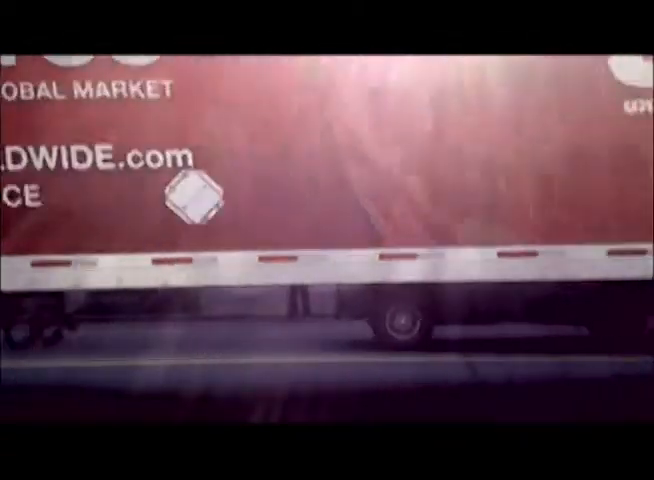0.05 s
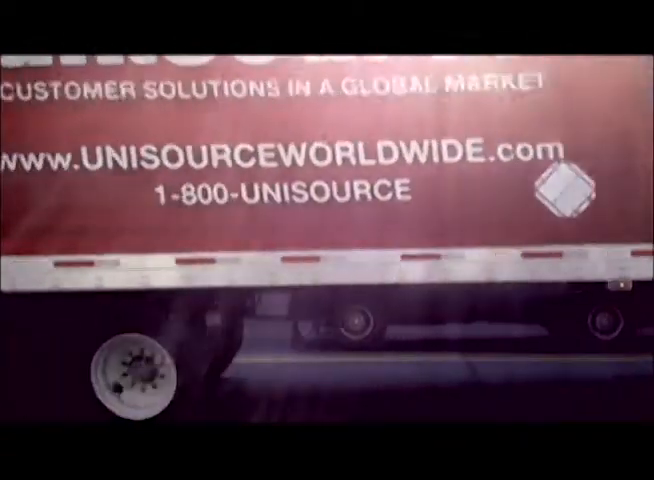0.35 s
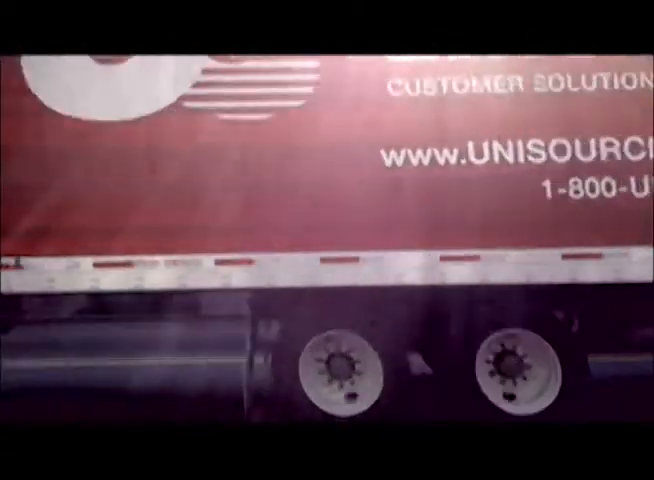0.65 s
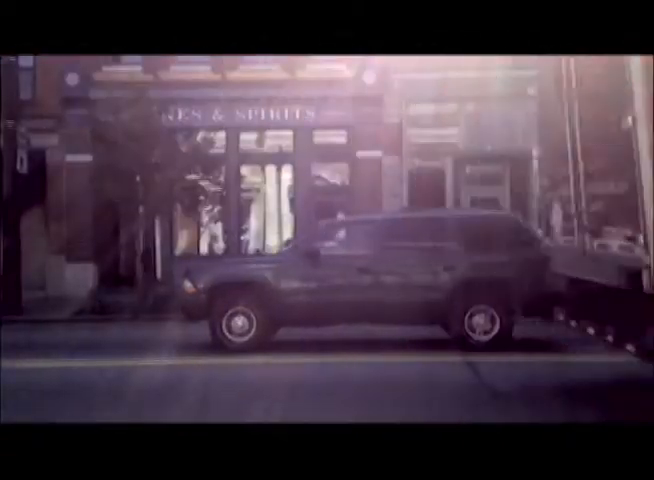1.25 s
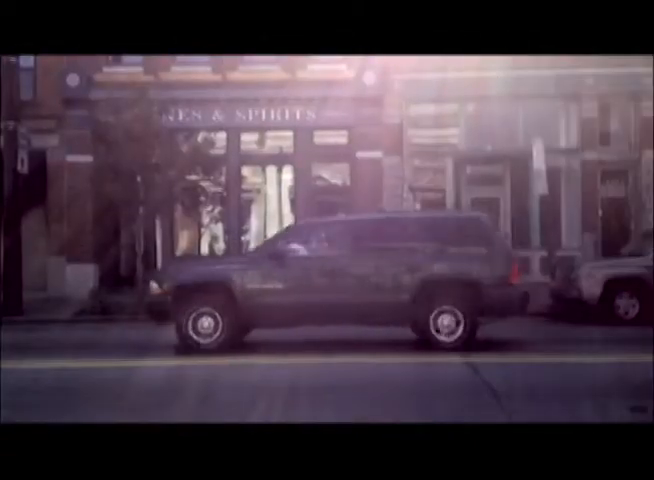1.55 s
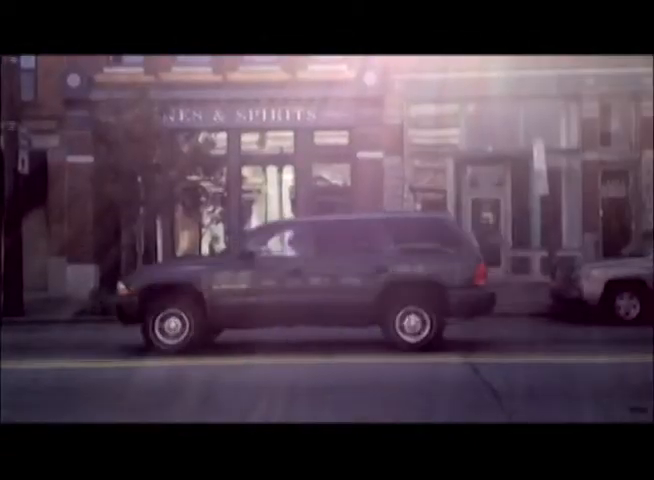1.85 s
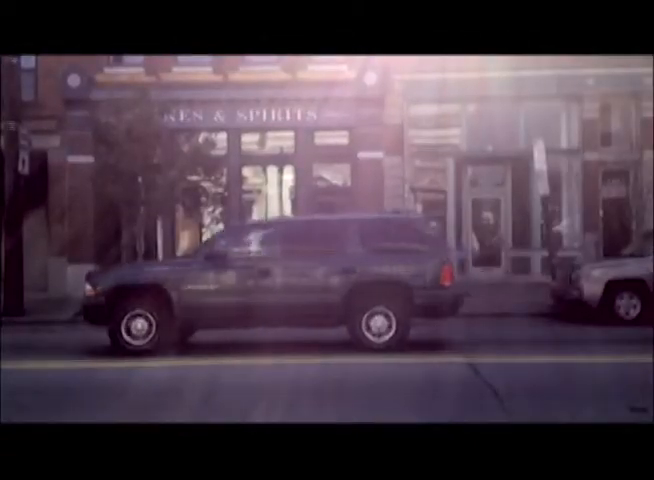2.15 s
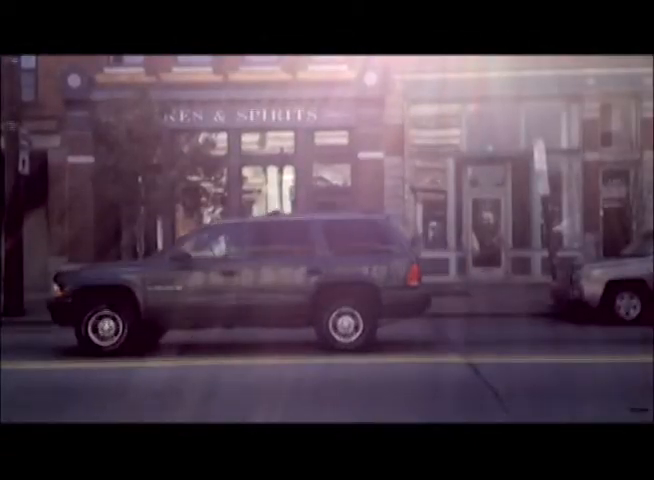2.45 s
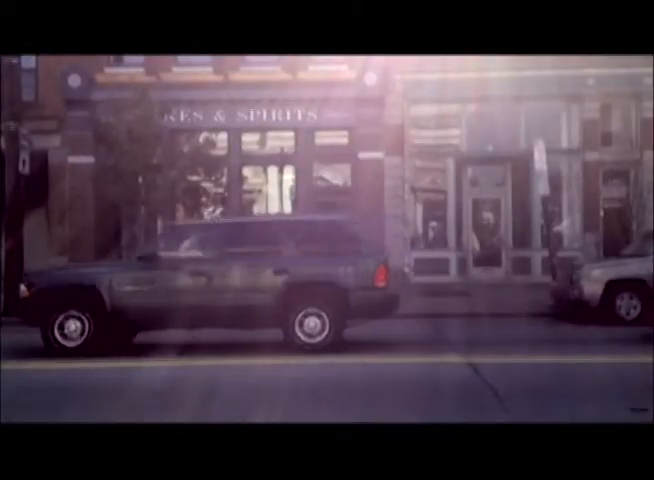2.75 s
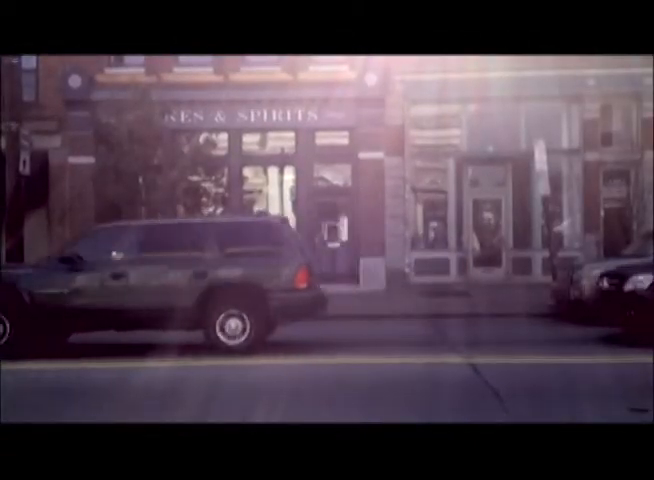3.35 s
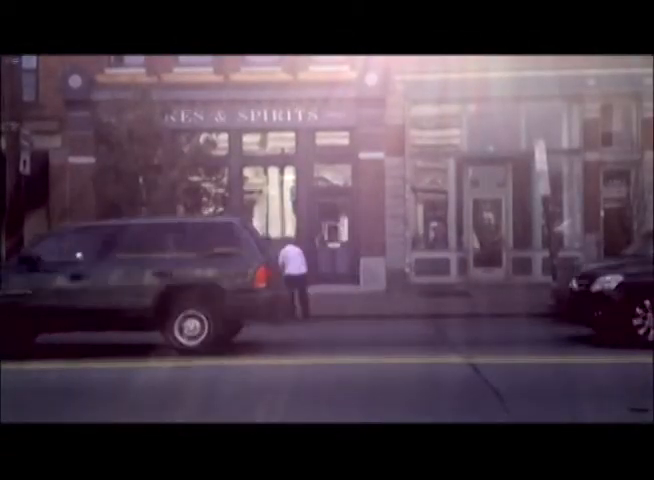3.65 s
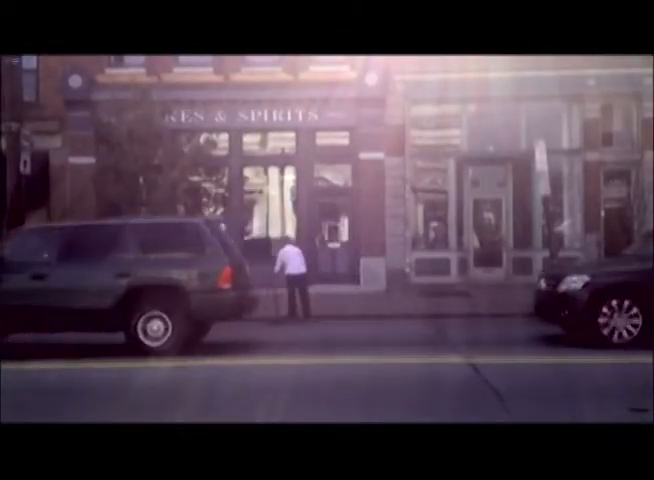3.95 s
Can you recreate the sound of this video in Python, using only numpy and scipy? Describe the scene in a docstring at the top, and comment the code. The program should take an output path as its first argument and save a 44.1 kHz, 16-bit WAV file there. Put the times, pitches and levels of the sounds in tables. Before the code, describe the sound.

A large truck passes close by, its engine droning and tyres roaring and hissing, loudest in the first second. The drone dies by about 1.2 seconds, and a faint high whistle winds down. Short, high metal squeaks recur from 0.3 to 3.4 seconds, sharpest around 0.5 and 1.7. Slow city traffic hums on with soft exhaust swells, and another car's tyres hiss faintly closer near 4 seconds.

```python
"""City street: a semi-trailer passes close by over the hum and wash of slow traffic.
Its exhaust drones, its tyres roar and hiss, and its turbo winds down as the throttle shuts.
Metal rubs in the running gear, squeaks and rings; the house fronts throw the squeaks back.
Car exhausts boom across the street, and at the end the tyres of another car draw near."""
import sys
import numpy as np
from scipy import signal
from scipy.fft import rfft, irfft
from scipy.io import wavfile
from scipy.ndimage import uniform_filter1d

SR = 44100
rng = np.random.default_rng(int(sys.argv[2]) if len(sys.argv) > 2 else 0)


def transcribe(signal):
    """Save signal, clipped to [-1, 1], as a 16-bit WAV file at the path in sys.argv[1]."""
    frames = np.atleast_2d(signal).T
    limited = np.clip(frames, -1, 1)
    pcm = np.round(limited * 32767).astype(np.int16)
    wavfile.write(sys.argv[1], SR, pcm)


N = 176400
T = np.arange(N) / SR

# two strongest exhaust tones (time [s], pitch [Hz], level [dB])
EXHAUST_LOW_TONE = [(0, 146.8, -24.5), (.15, 149.4, -25.5), (.28, 153.8, -20.5), (.44, 155, -23),
                    (.52, 156.9, -18.5), (.64, 156.7, -21), (.71, 156.5, -28), (.8, 157.1, -20),
                    (.93, 156, -32), (1.2, 151.4, -43)]
EXHAUST_HIGH_TONE = [(0, 181.2, -30), (.08, 184.4, -19.5), (.26, 190.5, -24), (.37, 179, -28),
                     (.43, 183.5, -25), (.5, 182.5, -28.5), (.72, 182.3, -25.5), (.83, 180.6, -36),
                     (1, 176, -58)]
# engine cycle (time [s], rate [Hz], level of summed overtones [dB])
ENGINE_CYCLE = [(0, 36.7, -24), (.28, 38.06, -27.5), (.5, 39, -35), (.8, 38.95, -31.5), (1.2, 38.2, -65)]
# its overtones (multiple [1], relative level [dB])
ENGINE_ORDERS = [(7, -7.5), (8, 5), (9, -7), (11, -4), (12, -3), (13, -6.5), (14, 1)]
# tyre roar with engine clatter; close hiss of air and tread (frequency [Hz], relative density [dB])
ROAR_SPECTRUM = [(30, -45), (60, -36), (110, -6.5), (170, 1), (300, 0), (480, -1.5), (680, -5), (1000, -3),
                 (1450, -5.5), (2000, -10), (2700, -21.5), (5000, -35.5)]
HISS_SPECTRUM = [(1000, -17), (2700, -10.5), (3300, -4.5), (3830, 0.5), (4150, -0.5), (4700, 0.5),
                 (5050, -11.5), (6050, -14.5), (7200, -8.5), (9500, -16), (13300, -12.5), (15300, -40)]
# their envelopes (time [s], level [dB])
ROAR_LEVEL = [(0, -22.5), (.25, -21), (.5, -25), (.8, -25.5), (1.1, -29.5), (1.35, -31.5), (1.7, -31),
              (2.2, -34.5), (3, -41), (4, -40.5)]
HISS_LEVEL = [(0, -26), (.3, -28.5), (.55, -32.5), (.9, -40), (1.3, -44), (1.7, -45.5), (2.2, -48),
              (3, -60), (4, -67)]
# turbo whistle and the whine below it (time [s], pitch [Hz], level [dB])
TURBO_WHISTLE = [(0, 12800, -45), (.4, 14000, -47), (.7, 14300, -51), (1, 12910, -47.5), (1.3, 11800, -51),
                 (1.65, 11000, -57), (2.1, 10800, -69), (2.6, 10500, -80)]
TURBO_WHINE = [(0, 8800, -51), (.35, 9430, -51), (.7, 10020, -55), (.95, 9650, -57), (1.15, 9300, -79)]
# traffic wash (frequency [Hz], relative density [dB])
WASH_SPECTRUM = [(25, -46), (45, -42), (70, -23.5), (110, -9.5), (165, -2.5), (230, -2), (330, -1.5),
                 (420, -8.5), (700, -12), (1100, -12.5), (1900, -16.5), (2800, -25.5), (4400, -24.5),
                 (5200, -33), (8000, -34), (9600, -38), (13500, -38), (15300, -57)]
# its envelope (time [s], level [dB])
WASH_LEVEL = [(0, -31.5), (2, -34.5), (2.8, -33), (3.5, -33), (4, -35)]
# running gear (start [s], length [s], mid pitch [Hz], level [dB], rise [Hz/s], third harmonic [dB])
GEAR_SQUEAKS = [(.33, 0.033, 9280, -36, 0, -60), (0.336, 0.047, 4600, -30.5, 0, -30),
                (0.449, 0.02, 4520, -24.5, 0, -30), (0.564, .036, 4510, -23, -1000, -30),
                (.668, .028, 4570, -34, -2000, -30), (1.473, 0.04, 4420, -37.5, -3, -30),
                (1.634, 0.037, 4490, -34.5, 500, -30), (1.722, 0.01, 4390, -22.5, 3000, -35),
                (1.812, 0.088, 9240, -55, 0, -60), (2.254, 0.045, 4360, -30, 2199, -20),
                (2.472, 0.022, 4380, -31.5, 0, -25), (2.908, .14, 4440, -45, 1399, -30),
                (3.09, .075, 4340, -44, 1200.5, -23), (3.213, 0.027, 4450, -40.5, 1, -15),
                (3.235, 0.13, 4500, -45, 1799.5, -30)]
# metal ringing after a squeak (start [s], length [s], pitch [Hz], level [dB], fade [dB/s])
METAL_RINGS = [(0.479, .24, 4465, -37, 13), (1.733, 0.24, 4453, -31, 113), (2.301, 0.171, 4410, -39, 75),
               (2.495, .09, 4400, -47, 55)]
# car exhaust booms (peak time [s], sigma [s], pitch [Hz], level [dB])
CAR_BOOMS = [(1.518, 0.047, 245, -31.5), (1.71, .045, 155, -37.5), (1.94, .035, 154, -36),
             (2.025, 0.052, 181, -32.5), (2.517, 0.045, 184, -34), (2.794, 0.15, 157, -31.5),
             (3.249, 0.043, 182, -36), (3.853, 0.034, 172, -36)]
# metal scrape (frequency [Hz], relative density [dB])
SCRAPE_SPECTRUM = [(1500, -25), (3000, 2), (4500, 6), (6000, -14), (7700, 1), (9500, -14), (15000, -30)]
# tyres of the approaching car (frequency [Hz], relative density [dB])
NEXT_CAR_SPECTRUM = [(500, -10), (1700, 8), (3000, -8), (7500, 1), (10000, -6), (15300, -4)]
# their envelope (time [s], level [dB])
NEXT_CAR_LEVEL = [(3.2, -71), (3.6, -57), (3.9, -50.5), (4, -49)]


def amp(db):
    """Decibels to gain."""
    return 10 ** (np.asarray(db) / 20)


def unit(x):
    """Scale to rms 1."""
    return x / np.sqrt(np.mean(x ** 2) + 1e-20)


def curve(rows, column=1):
    """One column of a time table, linearly interpolated."""
    rows = np.array(rows)
    return np.interp(T, rows[:, 0], rows[:, column])


def drift(rate_hz):
    """Smooth random motion, rms 1."""
    hz = np.fft.rfftfreq(N, 1 / SR)
    return unit(irfft(rfft(rng.standard_normal(N)) / (1 + (hz / rate_hz) ** 4), N))


def phase_rad(hz):
    """Running phase of a pitch, random start."""
    return 2 * np.pi * (np.cumsum(hz * np.ones(N)) / SR + rng.random())


def noise_band(hz, width_hz):
    """Noisy resonance around a pitch, rms 1."""
    phase = phase_rad(hz)
    return unit(drift(width_hz / 2) * np.cos(phase) + drift(width_hz / 2) * np.sin(phase))


def swell(peak_s, sigma_s):
    """Gaussian envelope."""
    return np.exp(-((T - peak_s) / sigma_s) ** 2 / 2)


def noise(spectrum, patchy_db):
    """Coloured noise, rms 1; level wanders in patches of time and frequency."""
    frames = dict(nperseg=512, noverlap=384)
    bins = signal.stft(rng.standard_normal(N), **frames)[2]
    patches = uniform_filter1d(rng.standard_normal(bins.shape), size=8, axis=0)
    patches = unit(uniform_filter1d(patches, size=14, axis=1))
    patchy = signal.istft(bins * amp(patchy_db * patches), **frames)[1][:N]
    hz, db = np.transpose(spectrum)
    colour_db = np.interp(np.log(np.fft.rfftfreq(N, 1 / SR) + 1), np.log(hz), db)
    return unit(irfft(rfft(patchy) * amp(colour_db), N))


def exhaust(waver_depth=0.0042, flutter_depth=0.5):
    """Two strong tones over fluttering engine overtones; all fade as the throttle shuts."""
    waver = 1 + waver_depth * drift(rate_hz=14)
    drone = sum(amp(curve(tone, column=2)) * unit(np.sin(phase_rad(curve(tone) * waver)))
                for tone in (EXHAUST_LOW_TONE, EXHAUST_HIGH_TONE))
    cycle = phase_rad(curve(ENGINE_CYCLE) * waver)
    overtones = np.zeros(N)
    for order, db in ENGINE_ORDERS:
        flutter = 1 + flutter_depth * drift(rate_hz=12.6)
        overtones += amp(db) * flutter * np.sin(order * cycle + 2 * np.pi * rng.random())
    return drone + amp(curve(ENGINE_CYCLE, column=2)) * unit(overtones)


def tyres():
    """Road roar plus close hiss of air and tread."""
    roar = amp(curve(ROAR_LEVEL)) * noise(ROAR_SPECTRUM, patchy_db=0.88)
    hiss = amp(curve(HISS_LEVEL)) * noise(HISS_SPECTRUM, patchy_db=1.23)
    return roar + hiss


def turbo(air_db=-6, blow_off_db=-48.5):
    """Airy whistle and thin whine spool up and down; air blows off as the throttle shuts."""
    whistle_hz = curve(TURBO_WHISTLE)
    core = noise_band(whistle_hz, width_hz=1300)
    air = amp(air_db) * noise_band(whistle_hz, width_hz=2400)
    whistle = amp(curve(TURBO_WHISTLE, column=2)) * unit(core + air)
    whine = amp(curve(TURBO_WHINE, column=2)) * noise_band(curve(TURBO_WHINE), width_hz=210)
    blow_off = amp(blow_off_db) * swell(peak_s=1.24, sigma_s=0.3) * noise_band(hz=7640, width_hz=2400)
    return whistle + whine + blow_off


def traffic(hum_db=-37.5):
    """Uneven hum of slow cars in a broad wash."""
    hum = amp(hum_db) * noise_band(hz=173, width_hz=40)
    wash = amp(curve(WASH_LEVEL)) * noise(WASH_SPECTRUM, patchy_db=1.16)
    return hum + wash


def squeaks(jitter_depth=0.011, second_db=-26):
    """Metal rubs on metal: short tones, some gliding, with weak harmonics."""
    out = np.zeros(N)
    jitter = 1 + jitter_depth * drift(rate_hz=172)
    for start_s, length_s, hz, db, rise_hz_per_s, third_db in GEAR_SQUEAKS:
        progress = np.clip((T - start_s) / length_s, 0, 1)
        phase = phase_rad(jitter * (hz + rise_hz_per_s * length_s * (progress - .5)))
        tone = np.sin(phase) + amp(second_db) * np.sin(2 * phase) + amp(third_db) * np.sin(3 * phase)
        arch = np.maximum(1 - (2 * progress - 1) ** 2, 0) ** 0.89
        out += amp(db) * np.sqrt(2) * arch * tone
    return out


def house_fronts(direct, t60_s=0.4, echo_db=-13, tap_density=0.02):
    """Direct sound plus a thin tail of scattered wall echoes."""
    taps = rng.standard_normal(SR) * (rng.random(SR) < tap_density)
    taps *= amp(-60 * T[:SR] / t60_s)
    return direct + amp(echo_db) * signal.fftconvolve(direct, taps / np.linalg.norm(taps))[:N]


def ringing(rise_hz_per_s=295, wander_hz=35, beat_hz=100):
    """Rubbed metal rings on: two close tones beat as they decay."""
    out = np.zeros(N)
    lower_offset_hz = wander_hz * drift(rate_hz=81)
    upper_offset_hz = beat_hz + wander_hz * drift(rate_hz=79.6)
    for start_s, length_s, hz, db, fade_db_per_s in METAL_RINGS:
        age_s = np.clip(T - start_s, 0, length_s)
        gate = (age_s > 0) & (age_s < length_s)
        envelope = uniform_filter1d(gate * amp(db - fade_db_per_s * age_s), size=128)
        pitch_hz = hz + rise_hz_per_s * age_s
        lower = np.sin(phase_rad(pitch_hz + lower_offset_hz))
        upper = np.sin(phase_rad(pitch_hz + upper_offset_hz))
        out += envelope * unit(lower + upper)
    return out


def car_booms():
    """Car exhausts across the street: brief low tones."""
    return sum(amp(db) * swell(peak_s, sigma_s) * unit(np.sin(phase_rad(hz)))
               for peak_s, sigma_s, hz, db in CAR_BOOMS)


def scrape(level_db=-34):
    """Metal scrapes just after the hardest squeak: one noise burst."""
    return amp(level_db) * swell(peak_s=1.74, sigma_s=0.009) * noise(SCRAPE_SPECTRUM, patchy_db=1)


def next_car():
    """Faint tyre hiss of an approaching car."""
    return amp(curve(NEXT_CAR_LEVEL)) * noise(NEXT_CAR_SPECTRUM, patchy_db=0)


def scene(grip_flutter_db=2.8):
    """Truck in front of the traffic, mono."""
    grip = unit(amp(grip_flutter_db * drift(rate_hz=50)))  # rubbing metal grips unevenly
    truck = exhaust() + tyres() + turbo()
    running_gear = grip * (squeaks() + scrape() + ringing())
    return (truck + house_fronts(running_gear) + traffic() + car_booms() + next_car())[None]


def record(dry, cutoff_hz=15300):
    """Steep FIR low-pass."""
    lowpass = signal.firwin(511, cutoff_hz, window=("kaiser", 9), fs=SR)
    return signal.oaconvolve(dry, lowpass[None], "same")


dry = scene()
out = record(dry)
transcribe(out)
```